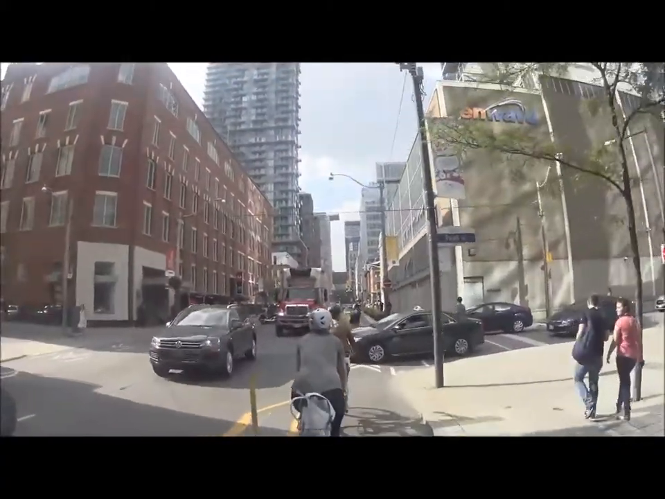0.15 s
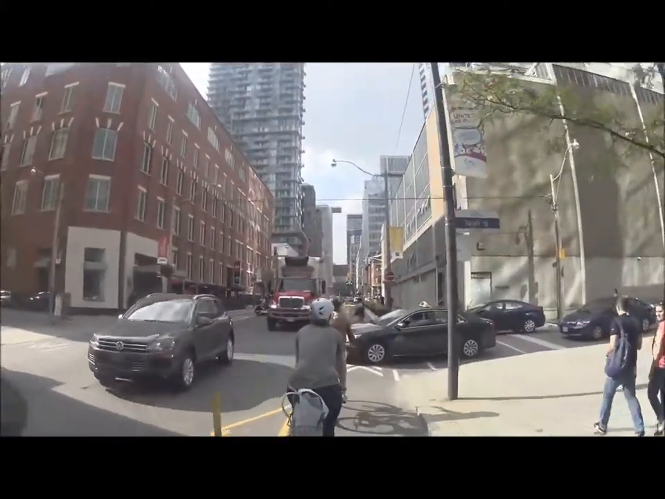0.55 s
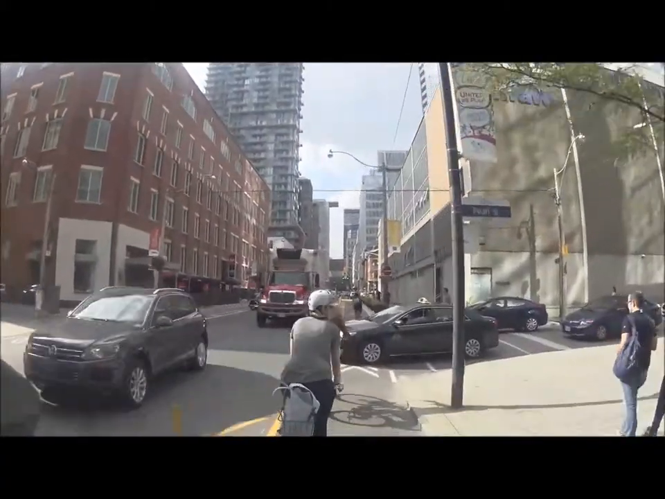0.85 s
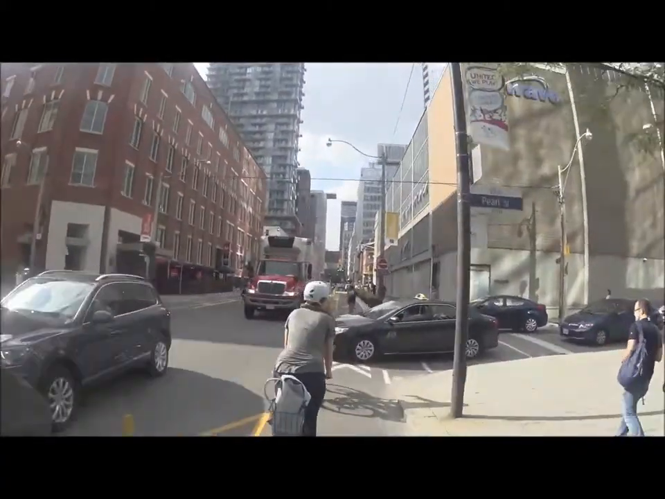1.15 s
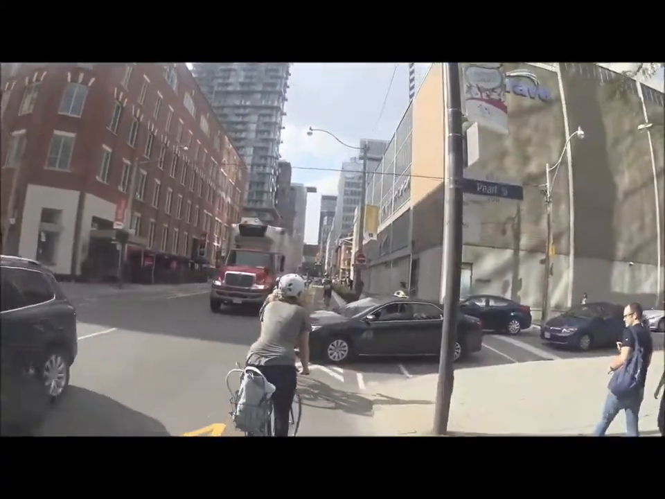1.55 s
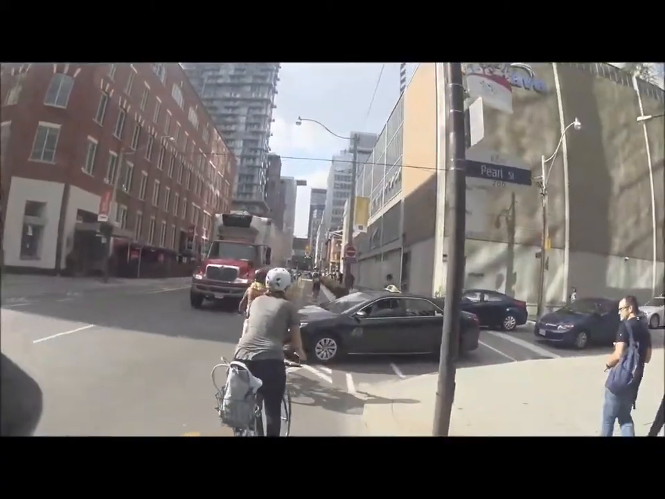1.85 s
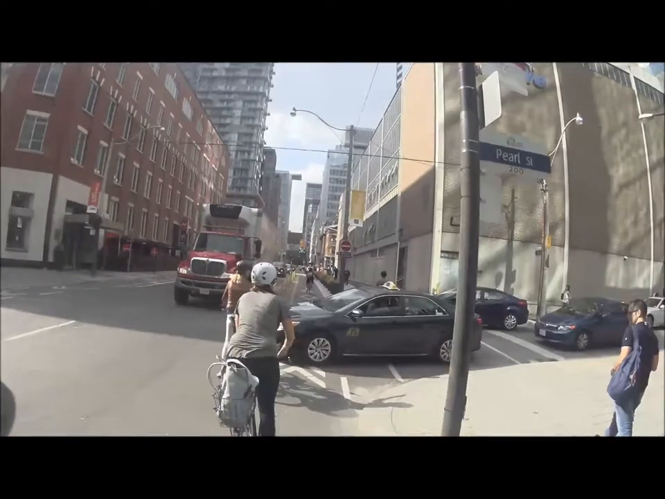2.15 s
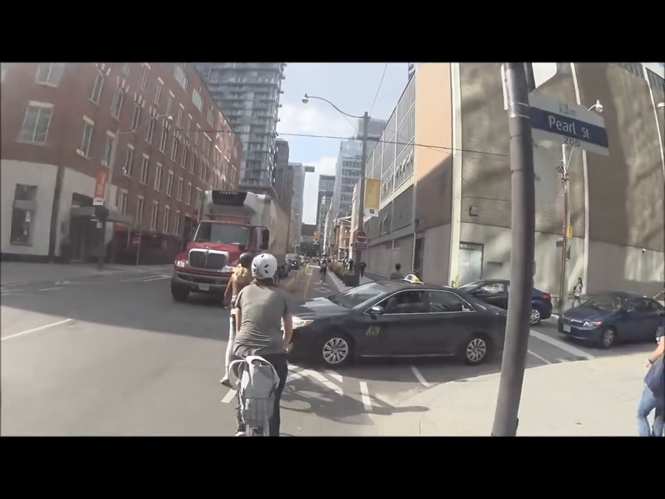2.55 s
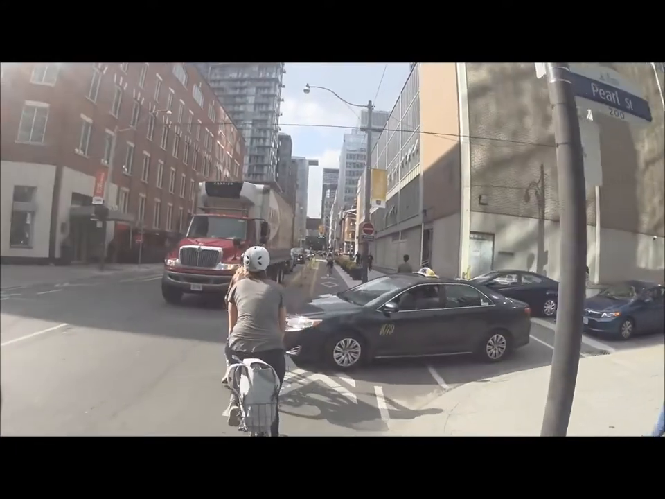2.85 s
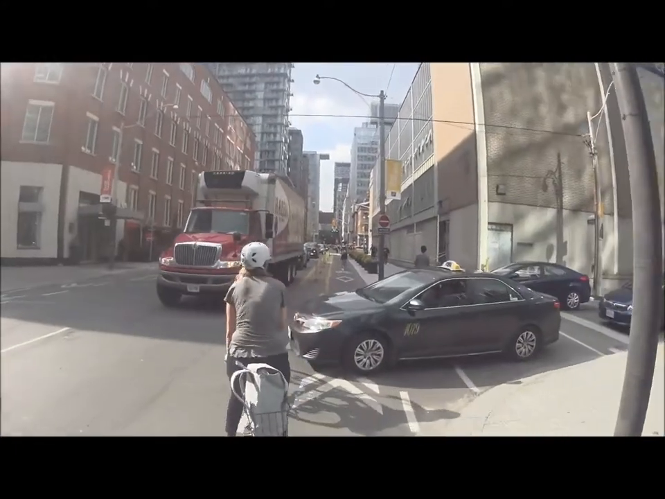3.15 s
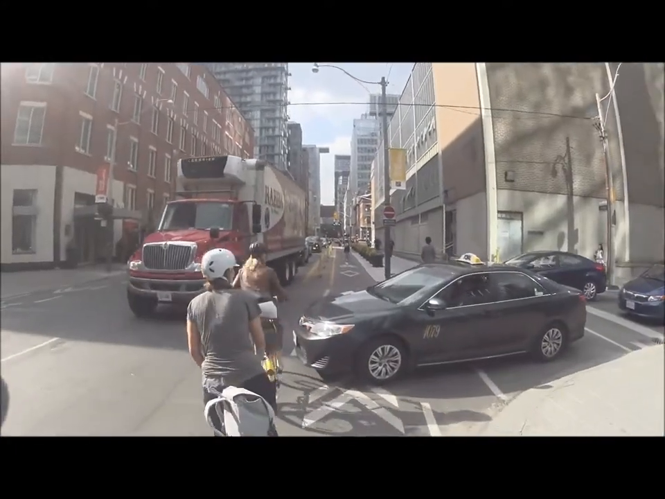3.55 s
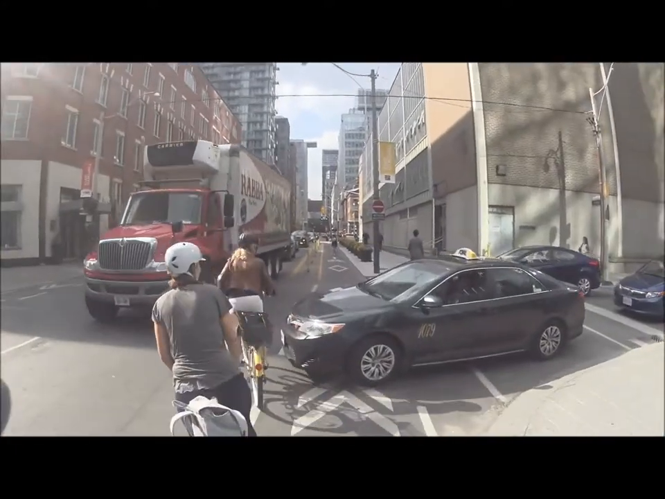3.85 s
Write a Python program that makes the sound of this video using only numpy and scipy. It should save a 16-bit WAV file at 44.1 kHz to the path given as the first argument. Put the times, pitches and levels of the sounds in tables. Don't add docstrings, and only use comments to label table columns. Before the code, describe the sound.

Piercing air horn held near the microphone cuts off, ringing between buildings before a truck engine approaches.

```python
import sys
import numpy as np
from scipy import signal
from scipy.fft import rfft, irfft, next_fast_len
from scipy.io import wavfile

SR = 44100
rng = np.random.default_rng(int(sys.argv[2]) if len(sys.argv) > 2 else 0)


def nominal_scale(level):
    x = np.asarray(level, float) / 20
    return 10 ** x


def dump_mix(stems):
    frames = np.atleast_2d(stems).T
    limited = np.clip(frames, -1, 1)
    pcm = np.round(limited * 32767).astype(np.int16)
    wavfile.write(sys.argv[1], SR, pcm)


N = 176400
STOP_S = 0.872
LEFT_RIGHT = np.array([[0.5], [-0.5]])


def at_hz(points, hz):
    p = np.array(points)
    return np.interp(np.log(hz + 1), np.log(p[:, 0]), p[:, 1])


def bumps(points, hz):
    return sum(db / (1 + (2 * (hz - centre) / width) ** 2) for centre, width, db in points)


def in_time(rows, t):
    s, *columns = np.transpose(rows)
    return [np.interp(t, s, c) for c in columns]


def rms_one(x):
    return x / np.sqrt(np.mean(x ** 2) + 1e-20)


def drift(rate_hz, size=N):
    pole = np.exp(-80 * np.pi * rate_hz / SR)
    white = rng.standard_normal(size // 40 + 2002)
    slow = signal.lfilter([1], [1, -2 * pole, pole * pole], white)[2000:]
    return np.interp(np.arange(size) / 40, np.arange(len(slow)), rms_one(slow))


def wavering_phase(hz, wander_hz, rate_hz, size=N):
    return 2 * np.pi * np.cumsum(hz + wander_hz * drift(rate_hz, size)) / SR


def fade(t, start_s, decay_s):
    return np.exp(-np.clip(t - start_s, 0, 4) / decay_s)


def noise(spectrum, patchy_db):
    # hz, correlation
    likeness = [(60, 0.8), (130, 1), (270, 1), (570, 0.85), (1210, 1), (2550, 0.69), (5410, 0.91),
                (11400, 0.55)]
    # centre_hz, width_hz, lift_db
    housing = [(771, 220, -7), (1352.5, 130, 11), (1715, 154, 6.5), (2210, 240, 5), (3055, 200, 5),
               (4646, 850, 6), (6910, 400, -6.5), (7600, 230, 1.5), (9070, 190, -11.5), (9930, 500, 2.5)]
    hz = np.arange(N // 2 + 1) * SR / N
    alike = np.clip(at_hz(likeness, hz), 0, 0.995)
    mid, side = rfft(rng.standard_normal((2, N)))
    pair = np.sqrt(1 + alike) * mid + np.sqrt(1 - alike) * side * [[1], [-1]]
    pair = pair * nominal_scale(at_hz(spectrum, hz) + bumps(housing, hz))
    octave = np.clip(np.log2((hz + 1) / 100), 0, 6)
    together = drift(3.0)
    out = 0
    for k in range(7):
        band = irfft(pair * np.clip(1 - abs(octave - k), 0, 1), N)
        out = out + band * nominal_scale(patchy_db * (1.1 * together + drift(5.0)))
    return rms_one(out)


def street():
    # hz, density_db_per_hz
    street_spectrum = [(15, -62), (25, -27.5), (47, -10), (182, -6.5), (603, -8.5), (1360, -7),
                       (3080, -9.5), (4750, -13), (11000, -28.5), (14300, -63), (22000, -120)]
    return nominal_scale(-41) * noise(street_spectrum, patchy_db=0.65)


def wind(t):
    # hz, density_db_per_hz
    wind_spectrum = [(8, 1), (30, 0), (50, -9), (120, -40), (400, -75)]
    # start_s, level_db
    gusts = [
        (0, -58.5),
        (.55, -61),
        (.7, -74),
        (1.5, -78),
        (3.2, -71),
        (3.5, -60.5),
        (4, -68),
    ]
    return nominal_scale(in_time(gusts, t)[0]) * noise(wind_spectrum, patchy_db=4.0)


def squeal(t):
    swell = np.exp(-((t - 0.66) / 0.18) ** 2)
    level = nominal_scale(-53 + 7.4 * drift(10.0))
    return level * swell * np.sin(wavering_phase(1155, 3.4, 6.0))


def puff(t):
    # hz, density_db_per_hz
    puff_spectrum = [(3000, -26.5), (5500, -10), (10000, 10), (11000, -14)]
    start_s, rise_s, decay_s = 1.56, 0.02, 0.09
    envelope = np.clip((t - start_s) / rise_s, 0, 1) * fade(t, start_s, decay_s)
    return nominal_scale(-57) * envelope * noise(puff_spectrum, patchy_db=3.0)


def truck(t):
    # start_s, level_db
    approach = [
        (1.2, -56),
        (1.8, -52),
        (2.2, -38.5),
        (2.6, -33),
        (3.0, -29.5),
        (3.4, -27),
        (3.75, -23.5),
        (4.0, -20.5),
    ]
    # start_s, pitch_hz, level_db
    engine = [
        (2.2, 151.9, -55),
        (2.45, 166, -54.5),
        (2.8, 180.7, -50),
        (3.05, 190, -43.5),
        (3.3, 199.1, -35.5),
        (3.5, 205.7, -34.5),
        (3.65, 213.5, -39),
        (3.79, 215.3, -35),
        (3.9, 218.8, -42),
        (4.0, 220, -37),
    ]
    # centre_hz, width_hz, level_over_roar_db
    pipe = [(343, 31, -16), (372, 17, -23.5), (409, 33, -27.5), (445, 11, -13)]
    # hz, density_db_per_hz
    roar_spectrum = [(15, -58), (25, -27), (141, -14.5), (207, -8), (740, -10.5), (1360, -6.5), (1950, -9),
                     (4630, -9.5), (11000, -26), (14300, -71), (22000, -120)]
    # hz, density_db_per_hz
    fan_spectrum = [(500, -39), (1100, -15), (1400, 3), (2200, -1), (2800, -9), (6000, -44)]
    level_db, = in_time(approach, t)
    note_hz, note_db = in_time(engine, t)
    phase = wavering_phase(note_hz, 0.86, 6.3)

    knock_db = 1 * np.sin(phase / 3)
    roar = nominal_scale(level_db + knock_db) * noise(roar_spectrum, patchy_db=0.81)

    fan_end_db, fan_growth_db_per_s = -27, 16.5
    fan = nominal_scale(fan_end_db + fan_growth_db_per_s * (t - t[-1])) * noise(fan_spectrum, patchy_db=0.5)

    fade_in = np.clip(2.5 * (t - 1.9), 0, 1)
    note = nominal_scale(note_db + 0.8 * drift(12.0)) * fade_in * np.sin(phase)
    lift = sum(nominal_scale(db) / (1 + (2 * (2 * note_hz - hz) / width) ** 2) for hz, width, db in pipe)
    octave = lift * nominal_scale(level_db + 5.2 * drift(25.0)) * np.sin(2 * phase)

    idle_db = -62.5 + 0.39 * (level_db + 29) + 3.0 * drift(5.0)
    idle = nominal_scale(idle_db) * np.sin(wavering_phase(54.7, 1.9, 3.3))
    return roar + fan + np.sqrt(2) * (note + octave + idle)


def walls(tone, t):
    near_db, near_t60_s = -32, 0.15
    far_db, far_t60_s = -30, 1.0
    roll_m_per_s, oncoming_m_per_s, spread_db = 2.2, 3.2, 3
    out, draws = np.zeros((2, len(t))), rng.random((48, 3))
    for k, (place, facing, side) in enumerate(draws):
        lag_s = 0.0092 + 0.8 * ((k + place) / len(draws)) ** 2
        gain = nominal_scale(near_db - 60 * lag_s / near_t60_s) + nominal_scale(far_db - 60 * lag_s / far_t60_s)
        oncoming = k % 9 == 5
        closing_m_per_s = roll_m_per_s * (1.2 * facing - 0.2) + oncoming_m_per_s * oncoming
        stretch = 1 + 2 * closing_m_per_s / 343
        heard = np.interp(STOP_S + (t - lag_s - STOP_S) * stretch, t, tone, left=0)
        pan = nominal_scale(spread_db * (2 * side - 1.5) * np.array([[1], [-1]]))
        out += gain * heard * (1 - 0.5 * oncoming) * pan
    return out


def horn():
    # start_s, pitch_hz
    reed = [
        (0, 1016),
        (.05, 1011.5),
        (.2, 1008.4),
        (.5, 1007.4),
        (.87, 1006.6),
    ]
    # multiple, level_db_rms, extra_db at high pressure, flutter_db, toward_walls_db
    overtones = [(1, -26.5, 1.8, 0.4, 3.5), (2, -15, -0.5, -0.4, -6), (3, -18, -4, -0.47, -3.5),
                 (4, -48.5, 22.5, 2.5, 5), (5, -26.5, 5.5, 1, 0.5), (6, -35.5, 4, 0, 8.5),
                 (7, -47, 6.5, 3, 9), (8, -41.5, 3.8, 2.7, 7.5), (9, -50, 3.5, 2.5, 6),
                 (10, -43.5, 2, 2, 2.5)]
    # start_s, left_minus_right_db
    turn = [
        (0, 0),
        (.16, 2),
        (.45, 1.2),
        (.64, 5.5),
        (.8, 1),
    ]
    # hz, density_db_per_hz
    hiss_spectrum = [(700, -26), (1400, -21), (2100, -6.5), (3500, -7), (4500, -11), (5300, -17),
                     (9500, -36), (10800, -18)]
    settle_s, release_s, first_release_s = 0.19, 0.0065, 0.022
    bell_spread_rad, sway_db = 0.9, 2.64

    lead, size = SR // 10, 2 * SR
    t = (np.arange(size) - lead) / SR
    phase = wavering_phase(in_time(reed, t)[0], 0.64, 25.0, size)
    valve = np.clip((t + 0.06) / 0.01, 0, 1) * np.exp(-np.clip(t - STOP_S, 0, 1) / release_s)
    pressure = fade(t, 0, settle_s)
    turn_db, = in_time(turn, t)

    tone, sent = 0, 0
    for k, db, early_db, flutter_db, wall_db in overtones:
        bell_rad = bell_spread_rad * (k - 1) * (k - 2)
        gate = valve ** (release_s / first_release_s if k == 1 else 1)
        wave = np.sqrt(2) * nominal_scale(db + pressure * early_db) * np.cos(k * phase - bell_rad) * gate
        sway = (sway_db * drift(6.2, size) + turn_db * (k == 2)) * LEFT_RIGHT
        tone = tone + wave * nominal_scale(flutter_db * drift(14.5, size) + sway)
        sent = sent + wave * nominal_scale(wall_db)

    tail_lift = nominal_scale(10.5 * (1 - fade(t, STOP_S, 0.058)))
    rush = nominal_scale(-41.5 + 4.5 * np.exp(-t[lead:] / 0.31)) * valve[lead:]
    hiss = noise(hiss_spectrum, patchy_db=0.4)[:, :size - lead]
    out = np.zeros((2, N))
    out[:, :size - lead] = (tone + tail_lift * walls(sent, t))[:, lead:] + rush * hiss
    return out


def scene():
    t = np.arange(N) / SR
    duck_db = -5.5 * fade(t, STOP_S, 0.26)
    traffic = nominal_scale(duck_db) * (street() + truck(t))
    return traffic + wind(t) + squeal(t) + puff(t) + horn()


def roll_off(x):
    return signal.sosfilt(signal.butter(12, 12050, fs=SR, output="sos"), x)


def record(dry):
    # hz, left_minus_right_db
    tilt = [(60, -2), (130, -1.5), (270, -2.5), (570, 0.5), (1210, 2), (2550, 7), (5410, 3), (11400, 4.5)]
    # hz, left_lead_rad
    phase_lead = [(0, 0), (1890, 0.31), (2840, 0.21), (3960, 0.28), (4220, -0.37), (6370, -0.48),
                  (6980, -0.04), (11600, -0.2)]
    size = next_fast_len(N + 8192)
    hz = np.arange(size // 2 + 1) * SR / size
    level = nominal_scale(at_hz(tilt, hz) * LEFT_RIGHT)
    turn = np.exp(1j * at_hz(phase_lead, hz) * LEFT_RIGHT)
    top_cut = np.clip((11110 - hz) / 80, 0, 1)
    mix = irfft(rfft(dry, size) * level * turn * top_cut, size)[:, :N]
    return roll_off(mix)


dry = scene()
out = record(dry)
dump_mix(out)
```